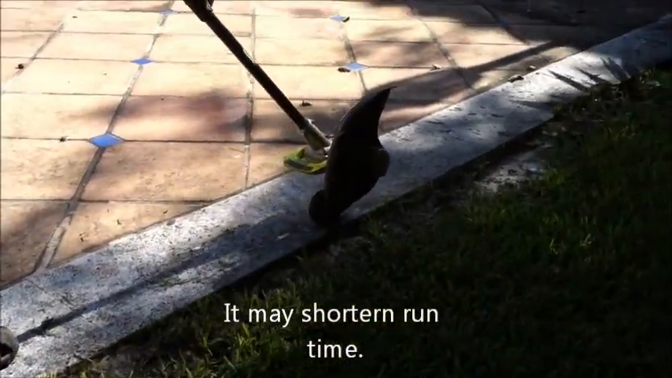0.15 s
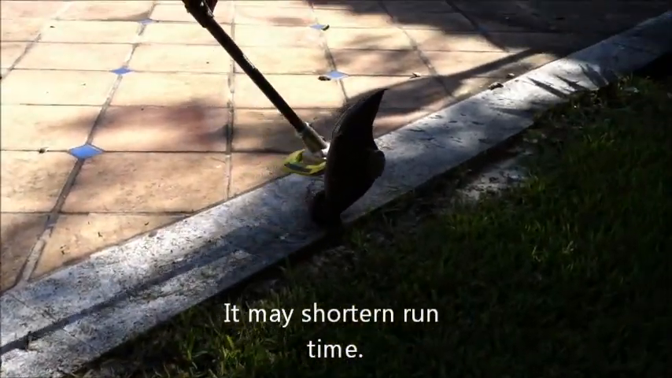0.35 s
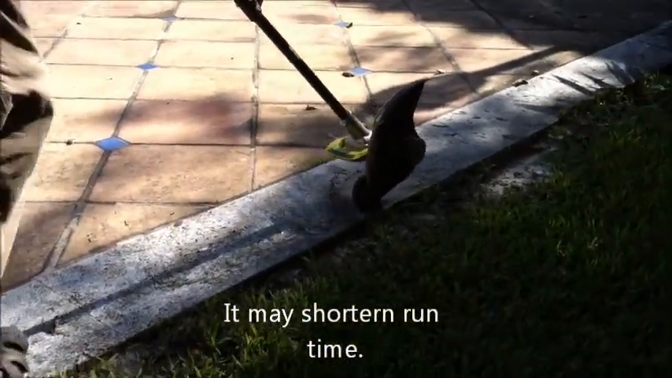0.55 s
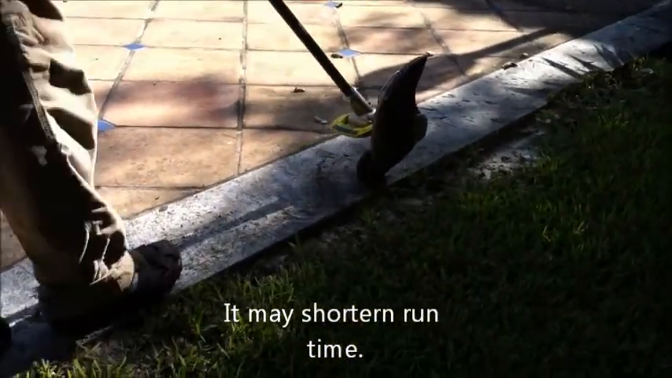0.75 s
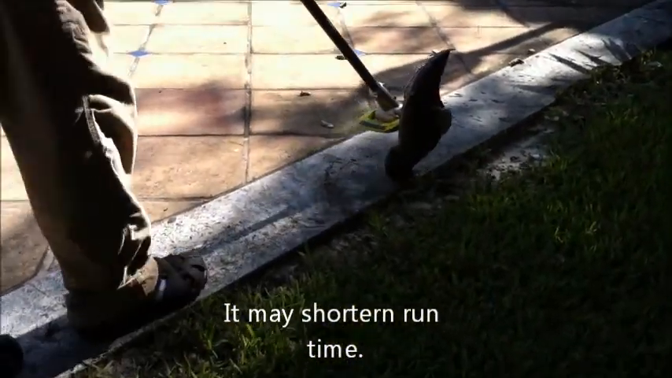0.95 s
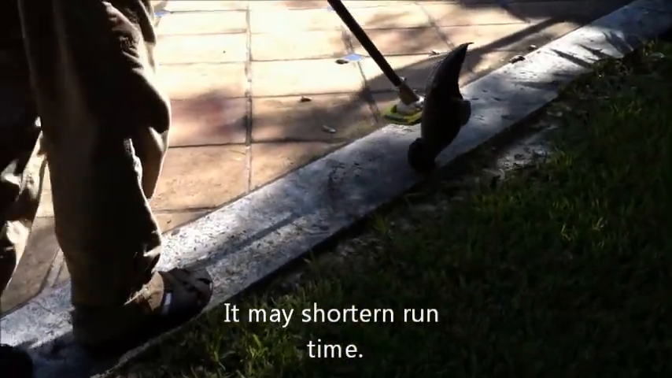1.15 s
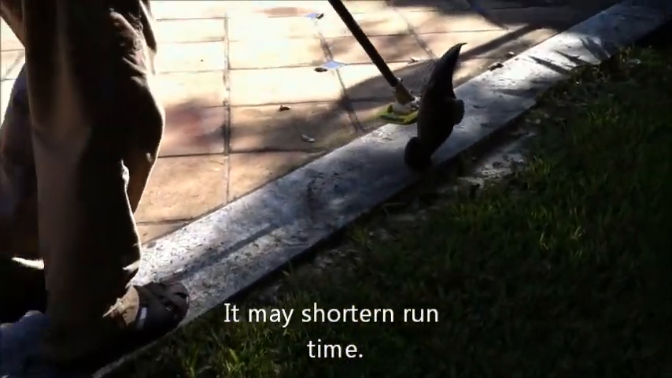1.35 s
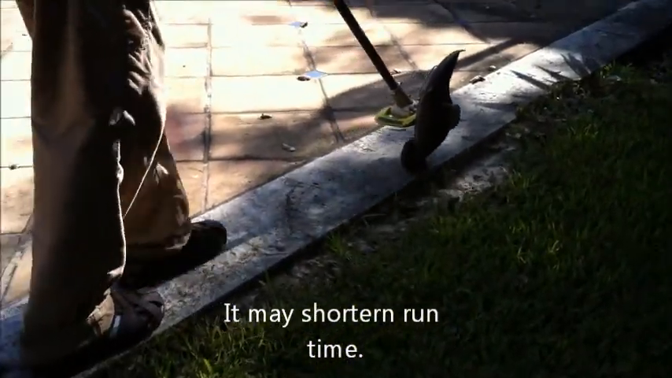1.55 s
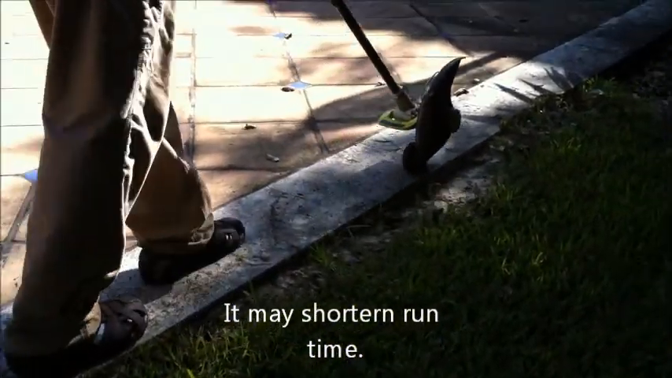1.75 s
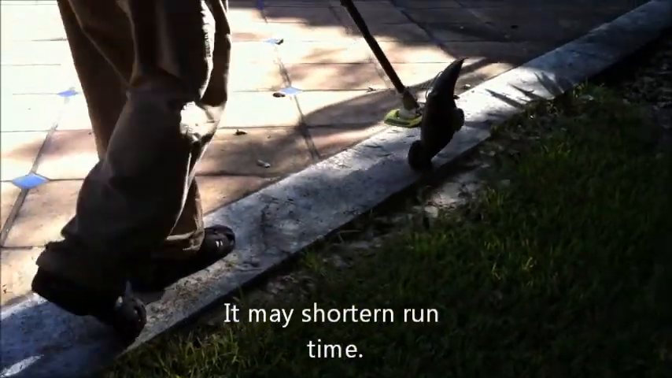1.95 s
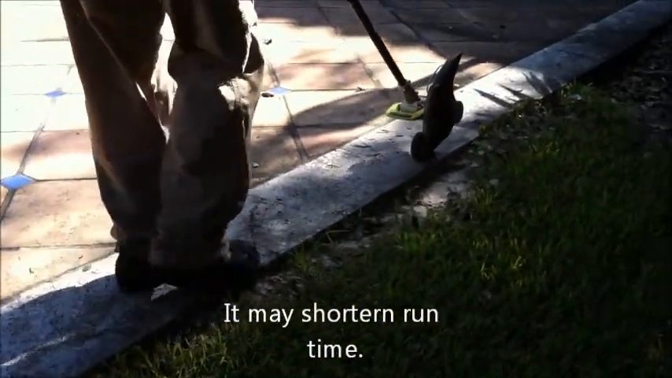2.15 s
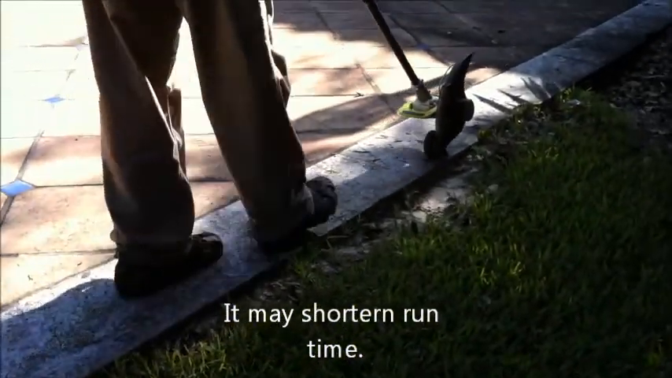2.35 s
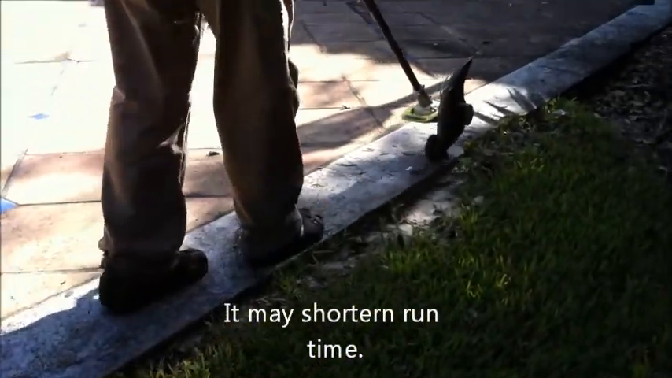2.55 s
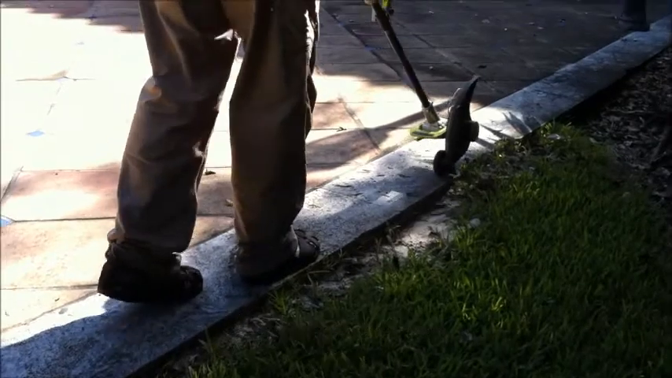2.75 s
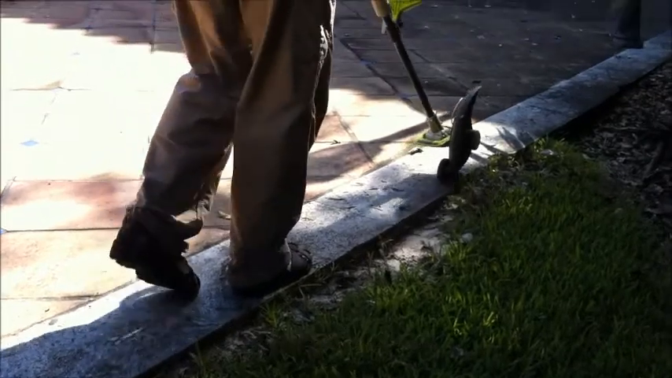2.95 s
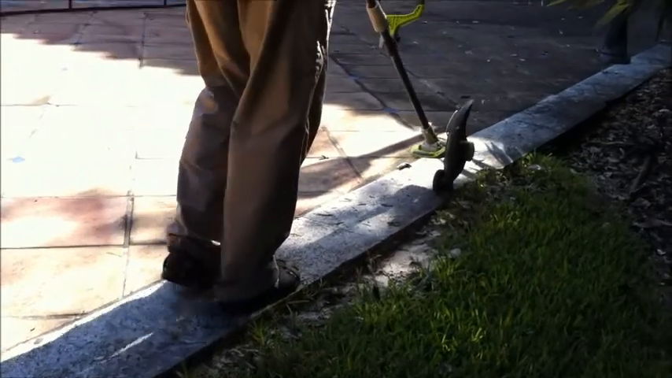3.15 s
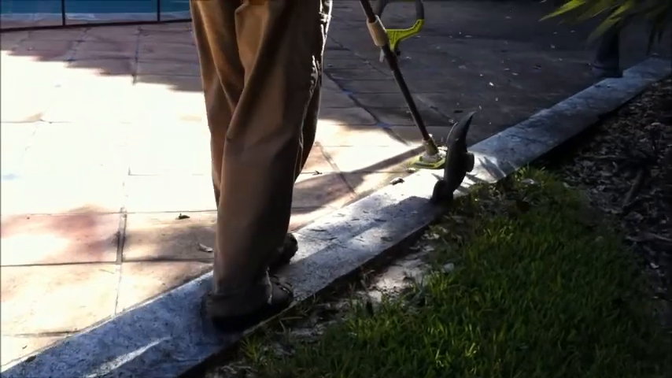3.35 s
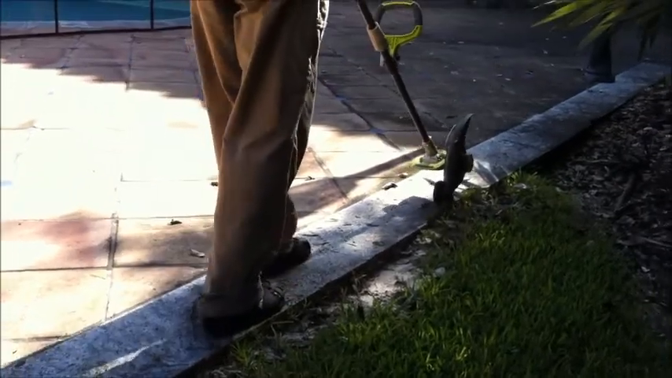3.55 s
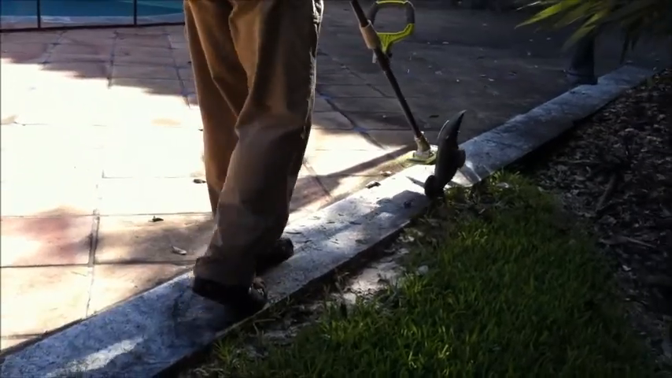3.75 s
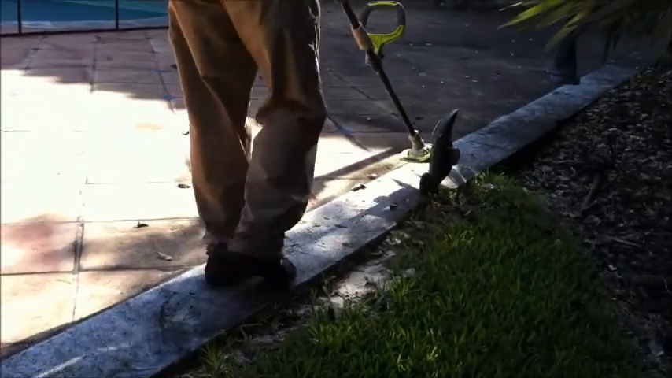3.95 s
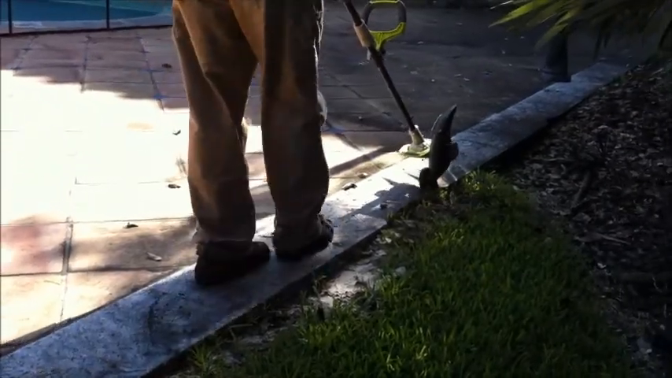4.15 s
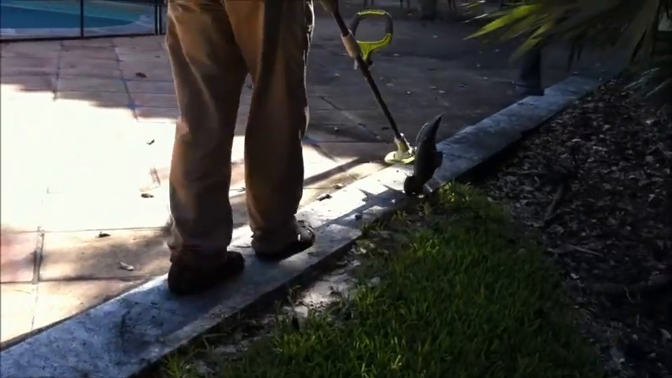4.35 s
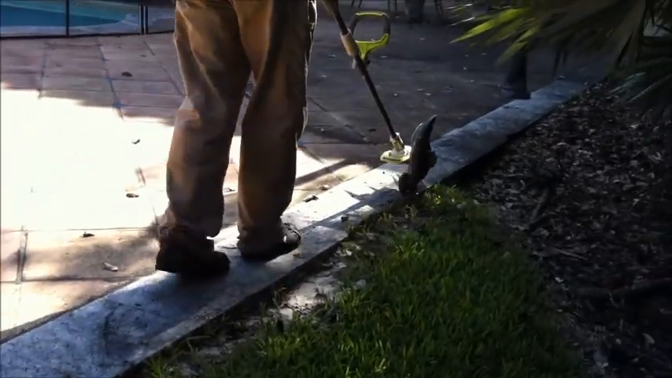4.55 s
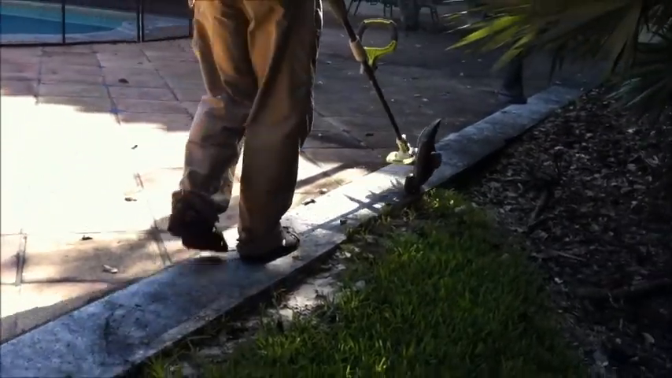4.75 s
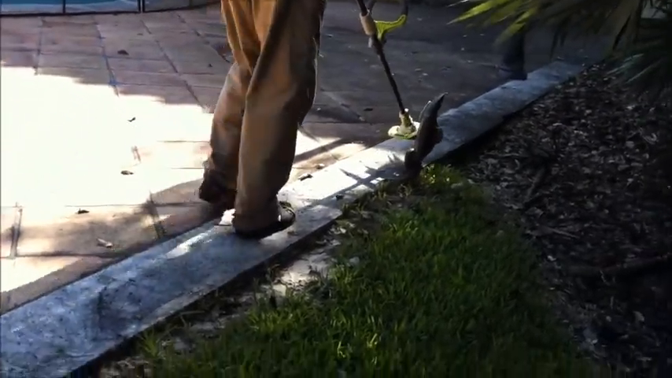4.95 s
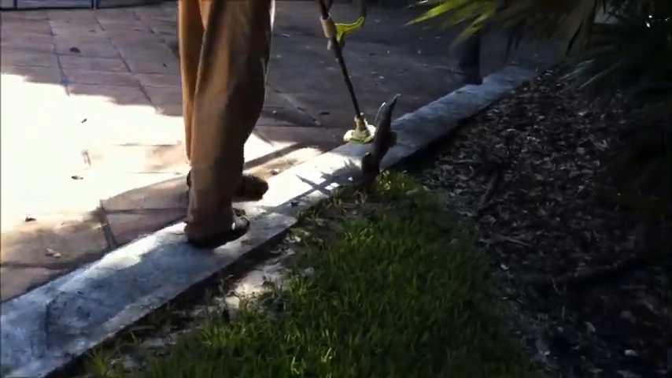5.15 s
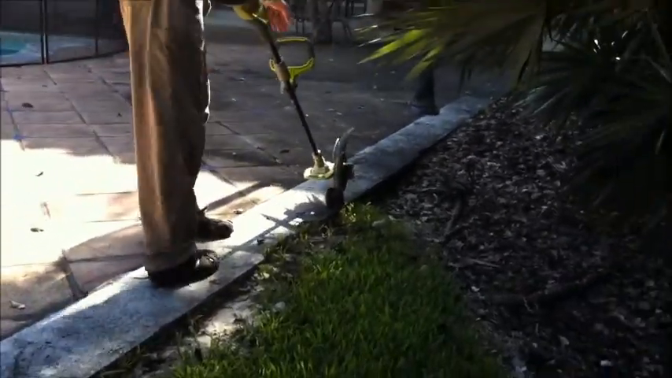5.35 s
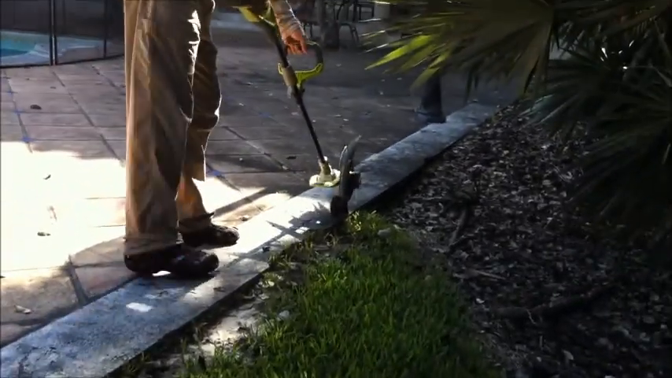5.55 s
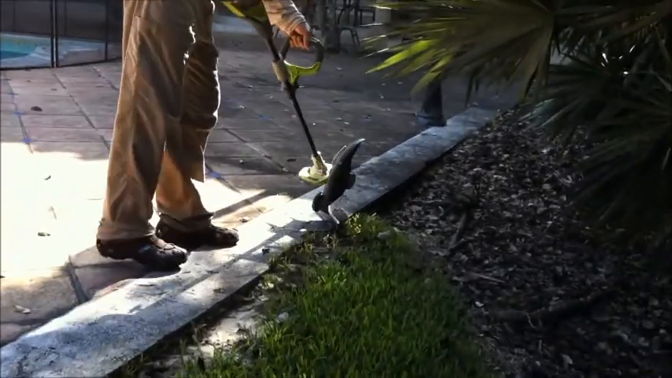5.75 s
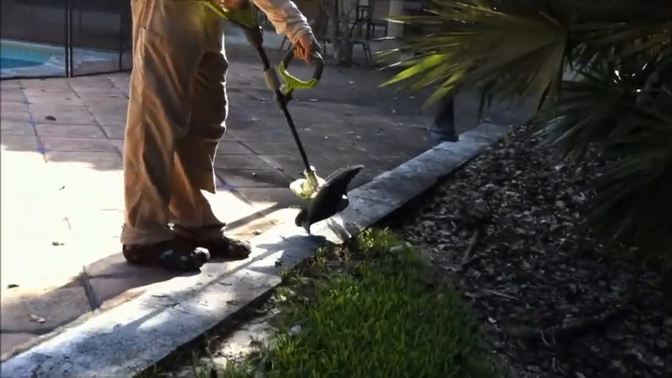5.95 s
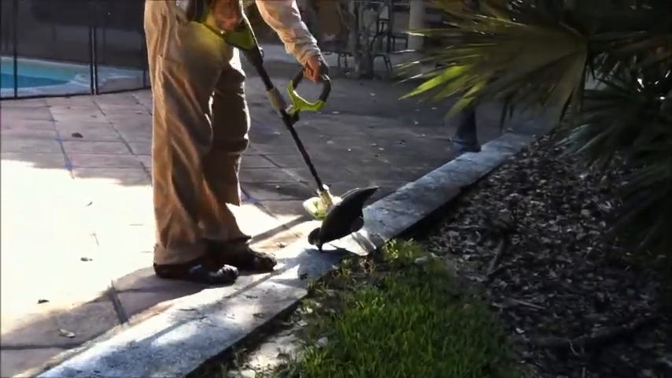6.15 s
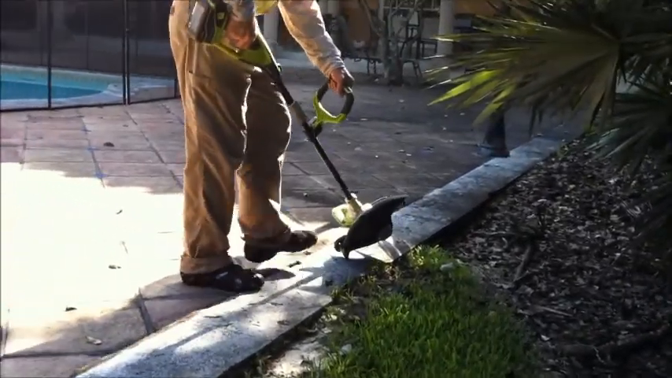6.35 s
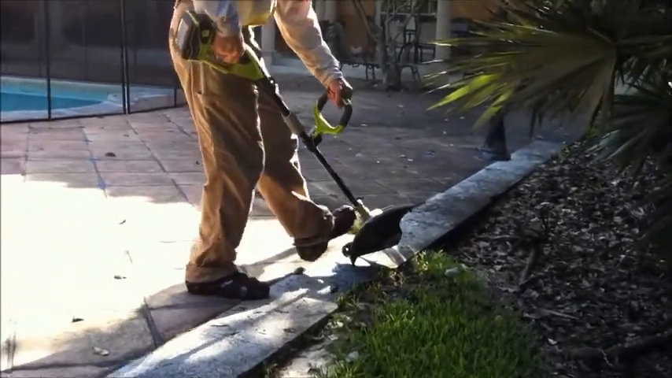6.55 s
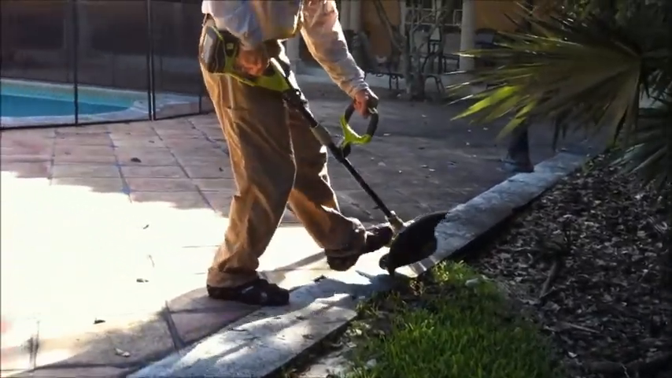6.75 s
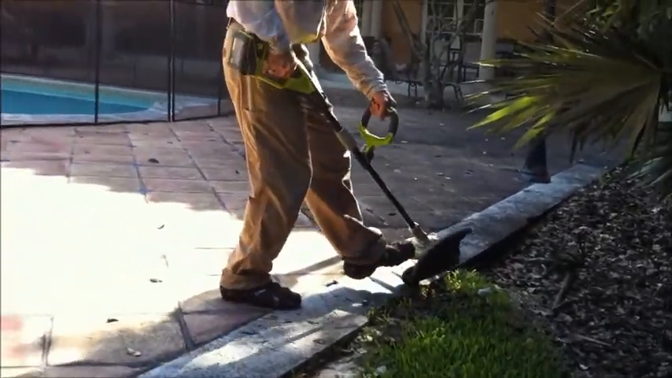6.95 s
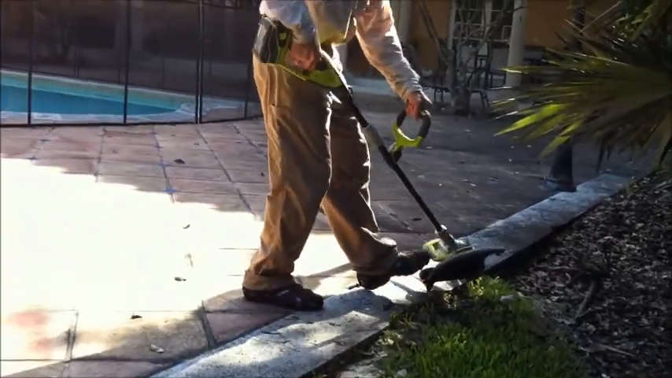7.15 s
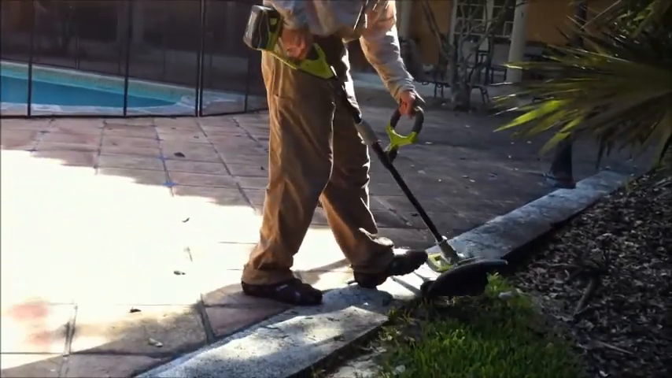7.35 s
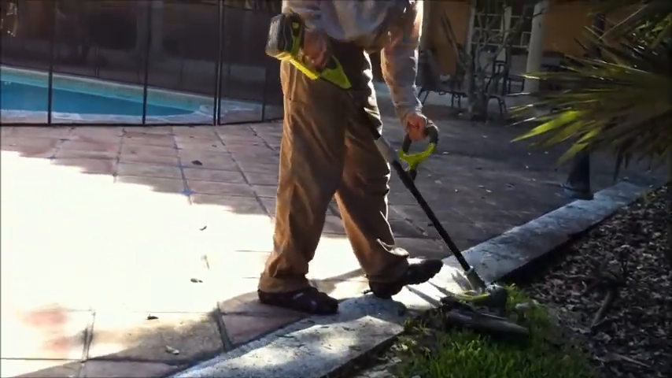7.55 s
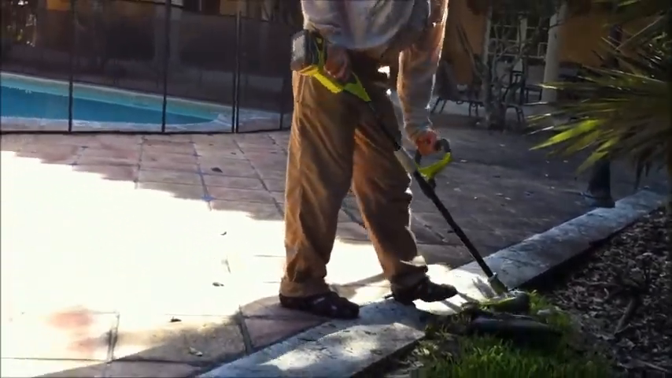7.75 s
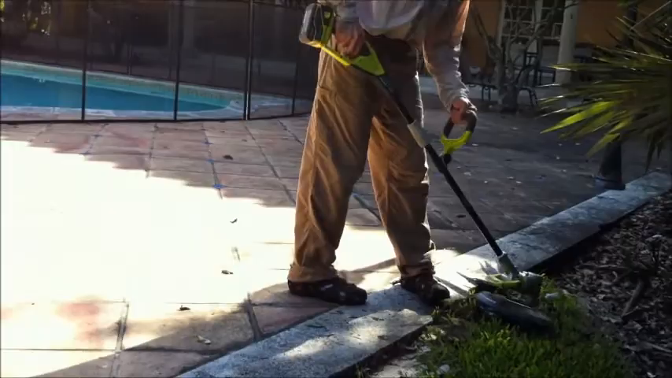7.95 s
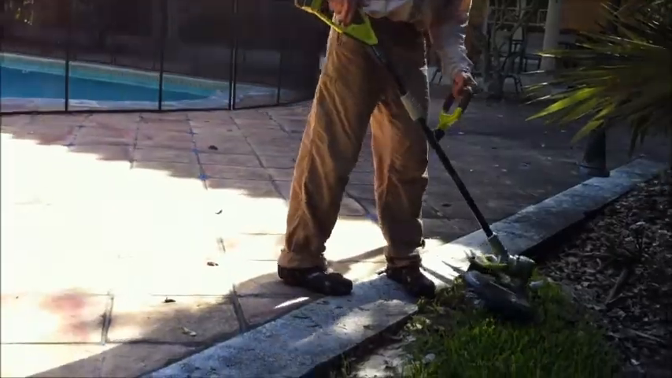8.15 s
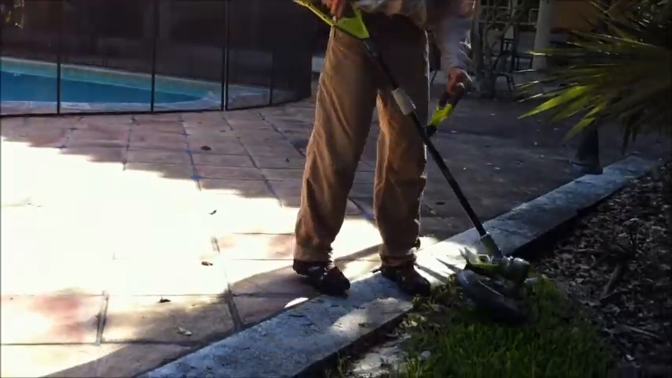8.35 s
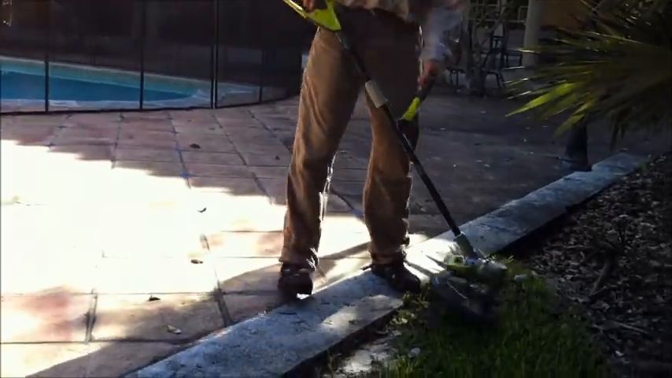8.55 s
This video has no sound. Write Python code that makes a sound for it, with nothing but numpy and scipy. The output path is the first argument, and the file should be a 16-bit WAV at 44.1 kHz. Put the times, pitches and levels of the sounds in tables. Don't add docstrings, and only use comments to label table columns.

```python
import sys
import numpy as np
from scipy import signal
from scipy.fft import rfft, irfft
from scipy.io import wavfile
from scipy.ndimage import uniform_filter1d

SR = 44100
rng = np.random.default_rng(int(sys.argv[2]) if len(sys.argv) > 2 else 0)


def rack_gain(trim_db):
    fader = np.asarray(trim_db, float)
    return 10 ** (fader / 20)


def log_audio(samples):
    frames = np.atleast_2d(samples).T
    limited = np.clip(frames, -1, 1)
    pcm = np.round(limited * 32767).astype(np.int16)
    wavfile.write(sys.argv[1], SR, pcm)


N = 378806
T = np.arange(N) / SR
SIZE = 512
HZ = np.fft.rfftfreq(SIZE, 1 / SR)
FRAMES = np.arange(N // (SIZE // 4) + 2) * (SIZE // 4) / SR
STOP_S, BRAKE_S = 4.875, 0.089
SILENT_S = 5.35
STRIKE = 1 + 5.1 * np.exp(-np.arange(6000) / 10.0)


def evened(x):
    return x / np.sqrt(np.mean(x ** 2) + 1e-20)


def read(points, hz):
    f, value = np.transpose(points)
    return np.interp(np.log(hz + 1), np.log(f + 1), value)


def columns(rows, t):
    s, *values = np.transpose(rows)
    return [np.interp(t, s, v) for v in values]


def steps(rows, blend):
    s, *values = np.transpose(rows)
    held = np.array(values)[:, np.searchsorted(s[1:], T)]
    return uniform_filter1d(held, max(int(blend * SR), 1), axis=1)


def plateau(t, s, length):
    return np.exp(-((t - s - length / 2) / (length / 2)) ** 4)


def add(mix, s, sound):
    part = mix[round(s * SR):][:len(sound)]
    part += sound[:len(part)]


def highpassed(x, hz):
    return signal.sosfilt(signal.butter(2, hz, "high", fs=SR, output="sos"), x)


def coloured(x, points):
    gain = rack_gain(read(points, np.fft.rfftfreq(len(x), 1 / SR)))
    return evened(irfft(rfft(x) * gain, len(x)))


def filtered(x, gain):
    overlap = SIZE * 3 // 4
    z = signal.stft(x, nperseg=SIZE, noverlap=overlap)[2]
    return signal.istft(z * gain[:, :z.shape[1]], nperseg=SIZE, noverlap=overlap)[1][:N]


def slow(hz):
    chance = uniform_filter1d(rng.standard_normal(N), int(SR / hz / 4))
    return evened(signal.lfilter([1], [1, -np.exp(-2 * np.pi * hz / SR)], chance))


def grains(per_s, spread_db, length):
    size = rack_gain(spread_db * np.minimum(rng.exponential(1, N), 3)) * (rng.random(N) < per_s / SR)
    decay = np.exp(-np.arange(400) / (length * SR))
    return evened(signal.oaconvolve(size, decay)[:N] * rng.standard_normal(N))


def burst(db, hz, width_hz, t60, chance):
    t = np.arange(len(chance)) / SR
    edges = [max(hz - width_hz / 2, 20), min(hz + width_hz / 2, 17000)]
    band = signal.butter(3, edges, "band", fs=SR, output="sos")
    x = signal.sosfilt(band, chance * rack_gain(-60 * t / t60))
    return rack_gain(db) * x / abs(x).max()


def braked(t):
    return np.clip((t - STOP_S) / BRAKE_S, 0, 1)


def hiss_level(t):
    # (time [s], hiss at full microphone gain [dB])
    load = [(0, -17), (.5, -17), (.85, -18), (1.1, -17.5), (1.3, -18), (1.5, -18.5), (2.2, -17.5),
            (2.7, -17), (2.92, -18.5), (4.03, -17.5), (4.08, -17.5), (4.13, -17.5), (4.89, -17.5)]
    # (time [s], drop [dB], share that stays down [0-1], recovery [s])
    ducks = [
        (1.526, 12, 0.46, 0.13),
        (4.146, 6.5, 0.55, 0.11),
        (4.182, 4, 0, 0.016),
        (4.225, 2, 0, 0.1),
        (4.299, 6, 0.02, 0.022),
        (4.36, 4, 0, 0.14),
    ]
    ring_out_s = np.maximum(t - STOP_S - BRAKE_S, 0)
    db = columns(load, t)[0] - 11.5 * braked(t) ** 2 - 89 * ring_out_s
    for s, drop_db, stays, back in ducks:
        db = db - drop_db * (t > s) * (stays + (1 - stays) * np.exp(-abs(t - s) / back))
    return db


def tones():
    # (time [s], head speed [turns per s], motor tone [Hz])
    speeds = [(0, 98.6, 403), (.6, 99.3, 411), (.8, 100.6, 414), (1.5, 101.5, 421), (2.1, 101.6, 423),
              (2.3, 101.7, 411), (2.82, 101.8, 413), (2.94, 100.3, 414), (3.5, 100.4, 418),
              (4.1, 100.2, 416), (4.4, 96.2, 420), (4.57, 97.6, 419), (5, 97.5, 421)]
    # (from [s], head orders 2, 3, 5 and motor tone [dB to hiss])
    stances = [(0, -35.5, -24.5, -39, -27.5), (.35, -35, -24.5, -36, -27), (.65, -31, -25, -43, -25.5),
               (1, -27, -21.5, -41, -24), (1.53, -24.5, -24, -30.5, -30), (2.2, -23, -24.5, -30, -27.5),
               (2.65, -24, -28, -28.5, -25), (2.95, -30, -17, -27.5, -23.5), (3.8, -27, -16.5, -31, -22),
               (4.15, -24, -30, -27, -26), (4.46, -26, -24.5, -22, -31)]
    # (head order [multiple of turn rate], level [dB to order 2])
    weak_orders = [(4, -11.5), (8, -4.5), (10, -11)]
    # (multiple of the motor tone, level [dB to the tone])
    motor_orders = [(.765, -4.5), (1.013, -7.5), (1.175, -8), (1.245, -12.5), (1.496, -14), (1.98, -6)]
    # (time [s], level [dB to order 2])
    whine = [(0, -14), (2.1, -13), (2.25, -3), (2.75, -2), (2.9, -10), (5, -8)]
    speed, motor_hz = columns(speeds, T)
    order_1_db = -30.5 - 5 * plateau(T, 4.11, 0.38)
    *db, motor_db = hiss_level(T) + np.vstack([order_1_db, steps(stances, .08)])
    turns = np.cumsum(speed * (1 + 0.00593 * slow(14.4))) / SR
    cycles = np.cumsum(motor_hz * (1 + .0045 * slow(12.8))) / SR
    lines = [(k * turns, d) for k, d in zip([1, 2, 3, 5], db)]
    lines += [(k * turns, db[1] + d) for k, d in weak_orders]
    lines += [(6.1 * turns + .12 * slow(20), db[1] + columns(whine, T)[0]), (cycles, motor_db)]
    lines += [(k * cycles, motor_db + d) for k, d in motor_orders]
    waver = [slow(8), slow(18), slow(12.4)]
    out = np.zeros(N)
    for k, (turn, d) in enumerate(lines):
        out += rack_gain(d + 2.2 * waver[k % 3]) * np.sin(2 * np.pi * (turn + rng.random()))
    return np.sqrt(2) * np.clip((4.99 - T) / 0.027, 0, 1) * out, turns


def line_sweeps(turns):
    # (from [s], bite of the second line end [0-1])
    line_ends = [(0, 0.36), (1.3, 0.3), (2.8, 0.56), (4.3, 0)]
    bite = rng.standard_normal((2000, 2))[(2 * turns).astype(int)]
    phase = 2 * turns % 1 - .5 - 0.035 * bite[:, 1]
    sweep = np.exp(-(phase / 0.34) ** 2) * rack_gain(1.6 * np.clip(bite[:, 0], -1.6, 1.6))
    return sweep * np.where(turns % 1 < .5, 1, steps(line_ends, .2)[0])


def guard(drive):
    # (frequency [Hz], width [Hz], level [dB])
    guard_modes = [
        (1308, 156, 2.5),
        (2268, 640, -2.5),
        (5740, 400, 0),
    ]
    away_s = 1.2
    out, span = np.zeros(N), 2 * SR
    for hz, width, db in guard_modes:
        turn = np.exp(2j * np.pi * np.cumsum(hz * (1 + 0.032 * T[:span])) / SR)
        r = np.exp(-np.pi * width / SR)
        ring = turn * signal.lfilter([1], [1, -2 * r, r * r], drive[:span] / turn)
        out[:span] += rack_gain(db) * evened(ring.real)
    fade = np.clip((span / SR - T) / .3, 0, 1)
    turned_db = -15.5 - 4.5 * T + (T > away_s) * (-5 - 10.5 * (T - away_s))
    return fade * rack_gain(hiss_level(T) + turned_db) * out


def line_spectrum(far, brake, hiss_db, boom_db, ring_db):
    # (frequency [Hz], level [dB per Hz])
    near_hiss = [(330, -42.5), (560, -19), (772, -10.5), (926, -7), (1240, -6.5), (1350, -10.5),
                 (1670, -17), (2140, -8), (2650, -19), (2950, -10), (3490, -8), (4250, -8), (4600, -3),
                 (5700, -3), (7330, 0), (14200, -7), (15100, -8), (15800, -10.5)]
    # (frequency [Hz], level [dB per Hz])
    far_hiss = [(330, -42), (560, -10.5), (730, -11.5), (913, -1), (1890, -10.5), (2250, -13), (2450, -17),
                (2720, -4.5), (2850, -3), (3050, -5.5), (3280, -13), (3700, -8), (4200, -9), (4500, -4),
                (5150, -2), (5750, 2.5), (7330, 2.5), (9290, 2), (10800, -3), (14900, -6.5), (15800, -14)]
    treble_db = -2.5 + 2 * far - 22 * brake
    shape_db = read(near_hiss, HZ)[:, None] * (1 - far) + read(far_hiss, HZ)[:, None] * far
    shape = rack_gain(shape_db + np.clip((HZ[:, None] - 7000) / 7000, 0, 1) * treble_db)
    bands = np.array([[600, 1700], [1700, 3800], [3800, 15500]])  # boom, ring, hiss [Hz]
    have = np.array([(shape[(HZ >= lo) & (HZ < hi)] ** 2).sum(0) / len(HZ) for lo, hi in bands])
    lift_db = np.array([hiss_db + boom_db, hiss_db + ring_db, hiss_db]) - 10 * np.log10(have)
    lift_db = uniform_filter1d(lift_db[np.searchsorted(bands[:2, 1], HZ)], size=3, axis=0)
    patches = uniform_filter1d(rng.standard_normal(shape.shape), size=4, axis=0)
    patches = evened(uniform_filter1d(patches, size=30, axis=1))
    return shape * rack_gain(lift_db + 1.29 * patches) * (FRAMES < SILENT_S)


def trimmer():
    # (time [s], distance [0 near - 1 far])
    distance = [(0, 0.26), (1, 0.43), (1.5, 0.83), (2.6, 1.16), (3, 0.95), (4.9, 0.97), (5, 0.44)]
    # (time [s], tip [-1 to 1])
    lean_curve = [(0, 0.22), (.3, 0.68), (.9, -0.19), (1.1, -0.38), (1.25, -0.62), (1.48, 0.64),
                  (1.7, 0.36), (2.05, 0.28), (2.85, 0.84), (3.1, 0.84), (4, 0.19), (4.6, 0.4)]
    # (frequency [Hz], level of the throbbing share [dB])
    throb = [(600, -1.5), (1300, -7.5), (3000, -1), (5000, -10.5), (6500, -19), (9000, 1.5), (12000, -4.5),
             (15000, -6)]
    # (frequency [Hz], level [dB per Hz])
    rumble_colour = [(30, -33.5), (85, -22.5), (130, -14), (170, -9), (250, -8.5), (320, -4.5), (420, 0.5),
                     (500, -12), (570, -15.5), (700, -21)]
    hum, turns = tones()
    sweep = line_sweeps(turns)
    grit = rng.standard_normal(N) + .4 * grains(900, 4.2, .00005)
    grit = 5.5 * np.tanh(grit / 5.5)
    far, lean = columns(distance, FRAMES)[0], columns(lean_curve, FRAMES)[0]
    brake, hiss_db = braked(FRAMES), hiss_level(FRAMES)
    snag = plateau(FRAMES, 4.08, 0.39)
    boom_db = -16.5 + 0.5 * far + 4.5 * snag + 2.5 * brake + 3 * lean
    ring_db = -17 + 1.5 * far + 5.5 * snag + 3 * brake + 3.5 * lean
    shape = line_spectrum(far, brake, hiss_db, boom_db, ring_db)
    share = (0.81 - .05 * FRAMES) * (1 - brake)
    share = np.clip(share * rack_gain(read(throb, HZ))[:, None], 0, 1)
    whip = filtered(evened(sweep * grit), shape * np.sqrt(share))
    air = filtered(rng.standard_normal(N), shape * np.sqrt(1 - share))
    rumble_db = uniform_filter1d(np.interp(T, FRAMES, hiss_db + boom_db), size=800)
    rumble_db = rumble_db - 3 + 8.5 * braked(T)
    rumble = rack_gain(rumble_db) * (T < SILENT_S) * coloured(rng.standard_normal(N), rumble_colour)
    return hum + guard((.5 + sweep) * grit) + whip + air + rumble


def yard():
    # (frequency [Hz], level [dB per Hz])
    wash = [(25, -23), (45, -27.5), (80, -20.5), (105, -10.5), (150, -6), (280, -7.5), (350, -1.5),
            (520, -11.5), (1040, -8.5), (1800, -15.5), (2700, -14), (4000, -19.5), (10500, -25),
            (14800, -24), (16000, -17)]
    # (frequency [Hz], level [dB])
    pump = [(112, -67.5), (222, -71.5), (296, -78.5), (355, -73.5), (475, -75.5)]
    # (time [s], level [dB])
    pump_swell = [(5.0, -3), (6.0, -2.5), (6.5, 2), (8.6, -1)]
    # (time [s], peak [dB])
    puffs = [
        (0.129, -43.5),
        (0.589, -52.5),
        (1.019, -52),
        (3.239, -47.5),
        (4.129, -49),
        (4.299, -54),
        (4.439, -58),
    ]
    out = rack_gain(-59 + 0.6 * slow(3.6)) * coloured(rng.standard_normal(N), wash)
    swell_db = columns(pump_swell, T)[0]
    for hz, db in pump:
        level = np.sqrt(2) * rack_gain(db + swell_db + 1.6 * slow(6.5))
        out += level * np.sin(2 * np.pi * hz * T + 0.47 * slow(5.5))
    for s, db in puffs:
        add(out, s - .02, burst(db, 48, 40, 0.21, rng.standard_normal(5000)))
    return out


def flicks():
    # (time [s], peak [dB])
    tip_hits = [(0.0176, -8.5), (0.0268, -8.5), (0.0887, -6), (0.14, -6), (0.16, -8), (0.2029, -6),
                (0.2119, -6), (0.3351, -7), (0.5566, -13), (0.5556, -4), (0.6076, -5), (0.6893, -10),
                (0.6977, -10), (0.7776, -8), (0.8285, -4), (0.838, -4), (0.8978, -8.5), (0.9178, -7),
                (0.9487, -9), (0.968, -7), (1.0081, -9), (1.0181, -5), (1.047, -5), (1.0869, -8),
                (1.1748, -9), (1.2062, -9), (1.2353, -6), (1.294, -8.5), (1.3538, -10), (1.363, -10),
                (1.3723, -7), (1.4132, -8.5), (1.4222, -8), (1.5006, -5.5)]
    out = np.zeros(N)
    for s, db in tip_hits:
        add(out, s + 0.00073, burst(db - 3.5, 10700, 6600, .014, rng.standard_normal(700)))
    return out


def slaps():
    # (time [s], peak [dB])
    flat_hits = [(0.027, -11.5), (0.131, -17), (0.376, -14), (0.406, -30.5), (0.436, -17), (0.506, -17.5),
                 (0.517, -19), (0.558, -17.5), (0.565, -18.5), (0.612, -16), (0.637, -21), (0.768, -17),
                 (0.848, -17), (0.889, -15.5), (0.959, -17.5), (1.156, -20), (1.235, -25.5), (1.343, -24),
                 (1.364, -20.5), (1.442, -23), (1.502, -17)]
    out, t = np.zeros(N), np.arange(900) / SR
    push_s = .00006
    push = (1 - t / push_s / 2) * np.exp(-t / push_s / 2)
    for s, db in flat_hits:
        chance = rng.standard_normal(900)
        ring = burst(db - 3, 1700, 2200, 0.021, chance)
        hollow = burst(db - 6.5, 1020, 500, 0.042, chance)
        add(out, s + .001, -rack_gain(db + 8) * push + ring + hollow)
    return out


def knocks():
    # (time [s], peak [dB], centre [Hz], t60 [s])
    thumps = [(0.604, -26, 200, 0.2), (4.215, -40, 185, 0.15), (4.262, -39, 170, 0.15),
              (5.6015, -42.5, 950, .03), (6.226, -45, 390, .07), (6.2505, -40, 600, 0.03),
              (6.7745, -38, 330, .04), (6.8, -39, 230, 0.12), (6.86, -44, 260, .12), (6.904, -38, 300, .1),
              (6.935, -44, 340, .04), (6.9545, -24, 320, 0.07), (6.987, -30, 230, 0.1),
              (7.02, -38, 330, .08), (7.049, -38, 845, 0.06), (6.238, -41, 800, .04), (7.58, -40, 600, .05),
              (7.745, -40, 400, .06), (7.21, -37, 410, .07), (7.444, -37.5, 354, 0.063),
              (7.56, -34, 950, .035), (7.728, -41, 900, .025), (7.887, -46, 560, 0.08),
              (6.772, -39, 950, .06), (7.436, -40, 180, .1)]
    out, t = np.zeros(N), np.arange(6000) / SR
    for s, db, hz, t60 in thumps:
        tone = rack_gain(db - 60 * t / t60) * -np.expm1(-t * hz * 3) * np.sin(2 * np.pi * hz * t)
        rattle = burst(db - 6.5, 1.3 * hz, 1.6 * hz, 1.33 * t60, rng.standard_normal(6000) * STRIKE)
        add(out, s, tone + rattle)
    return highpassed(out, 120)


def snaps():
    # (time [s], peak [dB], lowest frequency [Hz])
    cracks = [(1.5218, -3, 4000), (4.0903, -10, 1500), (4.1208, 3, 4500), (4.1411, 0, 4800),
              (4.1819, 2, 4300), (4.2044, -18, 9000), (4.2122, 1, 4300), (4.2552, -8, 8000),
              (4.2798, -12, 3000), (4.2866, -11, 800), (4.2971, 1, 4000), (4.3300, -3, 4200),
              (4.1325, -10, 6000), (4.1525, -16, 3000), (4.1665, -17, 2000), (4.2465, -19, 9000)]
    out = np.zeros(N)
    for s, db, low_hz in cracks:
        chance = rng.standard_normal(1200)
        crack = burst(db, low_hz / 2 + 8400, 16800 - low_hz, 0.012, chance * STRIKE[:1200])
        add(out, s, crack + burst(db - 18, 8800, 9600, 0.073, chance[::-1]))
    return highpassed(out, 120)


def pings():
    # (time [s], peak [dB], frequency [Hz], t60 [s])
    plastic_modes = [(5.6017, -29, 2500, .009), (5.6018, -38, 3300, .008), (5.7042, -23, 3900, .007),
                     (5.7042, -30, 5220, .008), (5.7043, -33, 6000, .008), (5.7044, -30, 4450, .007),
                     (5.7065, -41, 2200, .015), (5.7213, -43, 3900, .012), (5.737, -50, 3950, .012),
                     (6.2295, -35, 5250, .014), (6.2295, -39, 4150, .014), (6.2295, -39, 2800, .016),
                     (6.2305, -32, 700, .025), (6.2475, -33, 650, .025), (6.7700, -26, 360, .03),
                     (6.988, -29, 300, .06), (6.865, -40, 270, .08), (6.908, -36, 310, .05),
                     (6.9625, -38, 3200, .02), (6.997, -38, 5500, .012), (6.9245, -33, 380, .025),
                     (7.008, -37, 2800, .03), (7.033, -37, 1500, .02), (7.2085, -38, 2950, .05),
                     (7.5605, -34, 3300, .012), (7.728, -35, 650, .018), (4.15, -33, 200, .09),
                     (4.225, -35, 260, .08), (4.335, -37, 190, .12), (7.4425, -39, 1100, .02),
                     (7.886, -46, 2400, .015), (7.886, -47, 4500, .012)]
    out, t = np.zeros(N), np.arange(6000) / SR
    for s, db, hz, t60 in plastic_modes:
        add(out, s, rack_gain(db - 60 * t / t60) * np.expm1(-2 * t * hz) * np.sin(2 * np.pi * hz * t))
    return highpassed(out, 100)


def ticks():
    # (time [s], peak [dB], centre [Hz], width [Hz], t60 [s])
    clicks = [(4.2255, -22, 2500, 3600, .02), (4.2545, -20, 4000, 1500, .02), (4.342, -24, 1700, 800, .04),
              (4.3735, -24, 2500, 3600, .015), (5.272, -54, 1085, 250, .3), (5.443, -54, 2600, 3000, .03),
              (5.6035, -42, 2000, 1400, 0.015), (5.6018, -47, 4300, 2000, .015),
              (5.7042, -32, 5200, 3600, 0.03), (5.705, -41, 2300, 1000, 0.025),
              (5.707, -49, 3800, 600, 0.07), (5.7215, -46, 4300, 3000, .03), (5.729, -49, 4600, 2200, .05),
              (5.79, -54, 5500, 3000, .03), (6.222, -39, 2810, 2000, .04), (6.2298, -36, 5000, 7000, 0.02),
              (6.2298, -44, 5000, 1200, 0.04), (6.769, -50, 2500, 3600, 0.03),
              (6.960, -32, 2000, 2600, 0.06), (7.000, -35, 4800, 3000, .05),
              (7.208, -32, 3200, 1500, 0.071), (7.212, -31, 5530, 4030, 0.06),
              (7.466, -39, 5230, 3000, .03), (7.5605, -31, 3200, 4200, 0.05),
              (7.739, -41, 2600, 3000, 0.05), (7.747, -44, 3000, 2400, .04), (7.756, -41, 2600, 3600, 0.04),
              (7.764, -46, 2000, 2400, 0.04), (7.8856, -38, 5500, 7000, .025),
              (7.613, -45, 5000, 6000, .03), (7.4506, -39, 6000, 5000, .025),
              (7.4426, -40, 2500, 3000, .03), (7.366, -48, 2500, 2000, .03), (7.232, -38, 1500, 1800, .04),
              (6.757, -47, 2700, 1000, .04), (6.437, -46, 400, 500, .03)]
    out = np.zeros(N)
    for s, db, hz, width_hz, t60 in clicks:
        click = burst(db, hz, width_hz, 1.7 * t60, rng.standard_normal(6000) * STRIKE)
        add(out, s, click + burst(db - 19, hz, width_hz, 4 * t60, rng.standard_normal(6000)))
    return highpassed(out, 120)


def squeaks():
    # (time [s], length [s], frequency [Hz], level [dB])
    slides = [
        (5.27, 0.24, 2700, -72),
        (6.362, 0.24, 2650, -70),
        (6.75, .15, 2720, -62),
        (7.207, 0.08, 2900, -55),
        (8.088, .09, 2700, -64),
    ]
    wobble, flutter = slow(60), slow(30)
    out = np.zeros(N)
    for s, length, hz, db in slides:
        tone = np.sin(2 * np.pi * hz * T + .9 * wobble)
        out += rack_gain(db + 3.1 * flutter) * plateau(T, s, length) * tone
    return out


def bird():
    # (time [s], start [Hz], top [Hz], rise [s], length [s], level [dB])
    chirps = [
        (5.366, 5850, 8050, .04, 0.086, -62),
        (6.602, 5770, 7680, 0.013, 0.12, -65.5),
        (8.03, 6840, 7670, 0.018, .17, -68),
        (8.52, 5770, 8540, 0.037, .08, -61),
    ]
    out, trill = np.zeros(N), abs(slow(155))
    for s, start_hz, top_hz, rise, length, db in chirps:
        t = np.arange(0, length, 1 / SR)
        dip = np.sin(np.pi * 70 * (t - rise) + .5 * trill[:len(t)]) ** 2 * (t > rise)
        hz = np.interp(t, [0, rise], [start_hz, top_hz]) - (top_hz - start_hz) * dip
        whistle = np.sin(2 * np.pi * np.cumsum(hz) / SR)
        add(out, s, rack_gain(db) * whistle * signal.windows.tukey(len(t), .3))
    echoes = rng.standard_normal(8000) * rack_gain(-60 * np.arange(8000) / SR / .35)
    echoes = echoes / np.linalg.norm(echoes)
    return 0.93 * out + 1.05 * signal.oaconvolve(out, echoes)[:N]


def scuffs():
    # (frequency [Hz], level [dB per Hz])
    body_colour = [(76, -62), (130, -40), (178, -6), (231, -8.5), (269, -10), (416, 2), (506, -9),
                   (620, -31), (810, -49), (1360, -120)]
    # (frequency [Hz], level [dB per Hz])
    rasp_colour = [(350, -28), (600, -15), (656, -4), (765, -2), (1240, -6.5), (1470, -13), (1860, -8.5),
                   (2320, -13.5), (2640, -11), (3500, -15.5), (4550, -27), (7700, -120)]
    # (frequency [Hz], level [dB per Hz])
    fizz_colour = [(2060, -8.5), (3500, -2.5), (4450, -3), (9300, -9), (10600, -12.5), (13400, -7.5),
                   (15800, -20)]
    # (peak time [s], rise [s], body [dB], rasp [dB to body], fizz [dB to body])
    jerks = [(6.223, 0.002, -40, -3.5, -7), (6.771, .003, -45, -2, -7), (6.95, 0.099, -45, -7, -6.5),
             (6.955, 0.0042, -31, -6, -18), (7.035, .04, -47, 1, -12), (7.005, 0.051, -44, 6.5, -1),
             (7.2, .015, -43, -9, -27), (7.212, 0.0064, -43, 1.5, -0.5), (7.444, 0.02, -39, -9, -12.5),
             (7.47, 0.028, -48, 1, -4), (7.555, .03, -52, -9, -22), (7.56, 0.0035, -47, 4.5, -5),
             (7.586, 0.019, -49, -15, -5), (7.754, 0.081, -55.5, 2.5, -9.5), (7.889, 0.0091, -54.5, -3, -1)]
    # (time [s], length [s], body [dB], rasp [dB to body], fizz [dB to body])
    drags = [
        (6.26, 0.18, -61, -1.5, -11),
        (6.723, 0.078, -57.5, -3, -4),
        (6.802, 0.12, -55, -6, -4.5),
        (6.78, .17, -58, -3, -20),
        (7.066, 0.23, -55.5, 0.5, -11.5),
        (7.287, 0.23, -64, 5, -1),
        (7.64, 0.097, -62, 1, 2),
        (7.8, 0.088, -72, -7, 0),
        (7.938, 0.092, -75, 14, 13.5),
    ]
    # (time [s], length [s], level [dB])
    rustles = [
        (5.498, 0.15, -60.5),
        (5.72, 0.15, -67.5),
        (6.322, 0.1, -68),
        (8.297, 0.088, -59.5),
    ]
    slips = grains(260, 2.5, 0.004) + 0.84 * rng.standard_normal(N)
    body, rasp = coloured(slips, body_colour), coloured(slips, rasp_colour)
    fizz = coloured(grains(1500, 2.2, 0.00055) + rng.standard_normal(N), fizz_colour)
    power, first = np.zeros((3, N)), 6 * SR
    t = T[first:]
    fall = np.array([[231], [211], [220]])  # body, rasp, fizz [dB per s]
    for s, rise, db, rasp_db, fizz_db in jerks:
        shape_db = np.where(t < s, 20 * (t - s) / rise, fall * (s - t))
        layer_db = db + np.array([[0], [rasp_db], [fizz_db]])
        power[:, first:] += rack_gain(layer_db + shape_db) ** 2 * (t > s - rise)
    for s, length, db, rasp_db, fizz_db in drags:
        layer_db = db + np.array([[0], [rasp_db], [fizz_db]])
        power[:, first:] += rack_gain(layer_db) ** 2 * plateau(t, s, length)
    out = highpassed((np.sqrt(power) * [body, rasp, fizz]).sum(0), 110)
    for s, length, db in rustles:
        out += rack_gain(db) * plateau(T, s, length) * (fizz + .5 * rasp)
    return out


def scene():
    running = trimmer() + yard() + flicks() + slaps()
    struck = knocks() + snaps() + pings() + ticks()
    return (running + struck + squeaks() + bird() + scuffs())[None]


def top_cut(x):
    return signal.sosfilt(signal.butter(12, 17000, fs=SR, output="sos"), x)


def record(dry):
    limited = 0.93 * np.tanh(dry / 1.01)
    edge = signal.oaconvolve(limited, signal.firwin(767, 15800, fs=SR)[None], "same")
    mix = edge + .008 * (limited - edge)
    return top_cut(mix)


dry = scene()
out = record(dry)
log_audio(out)
```